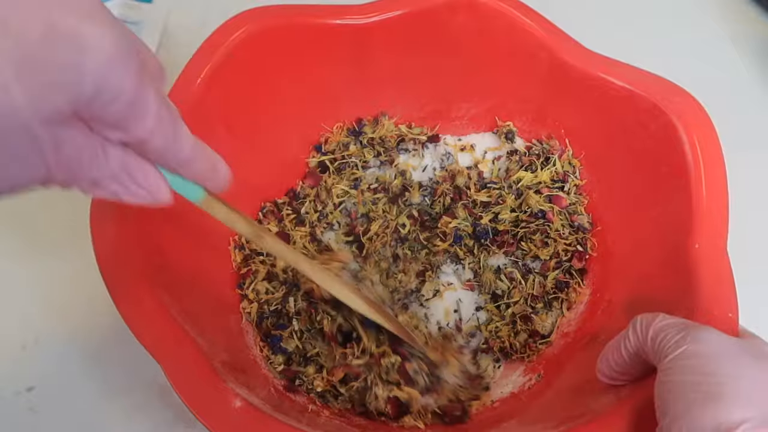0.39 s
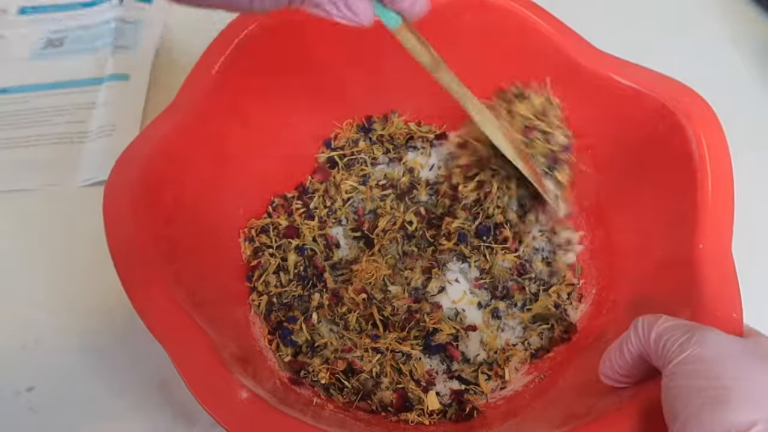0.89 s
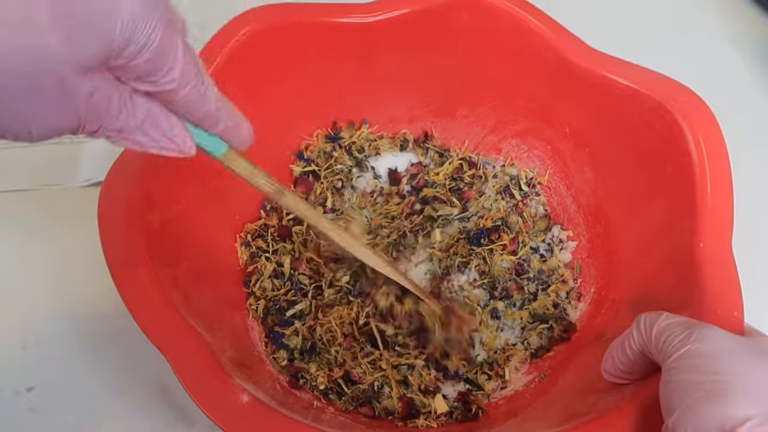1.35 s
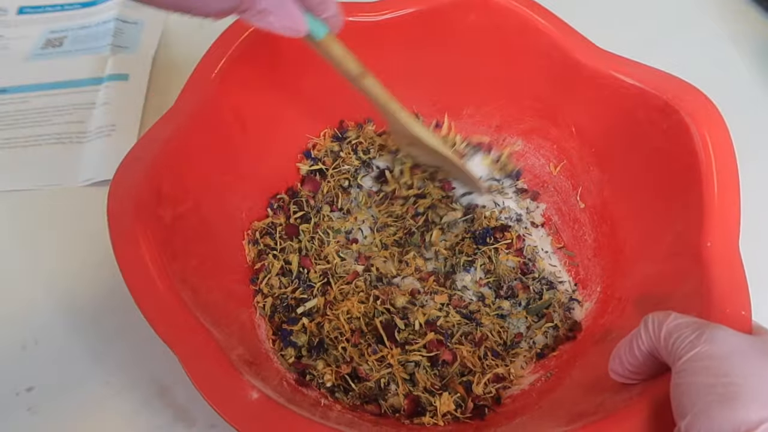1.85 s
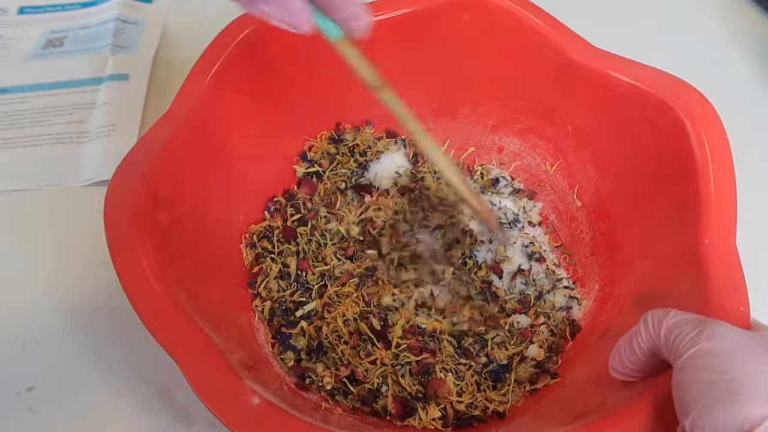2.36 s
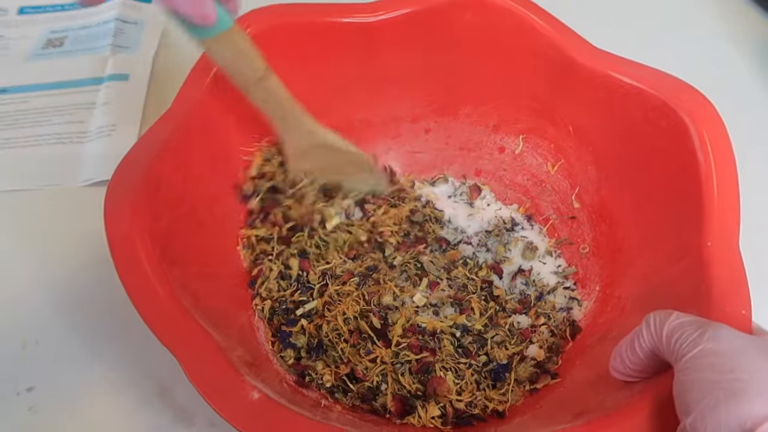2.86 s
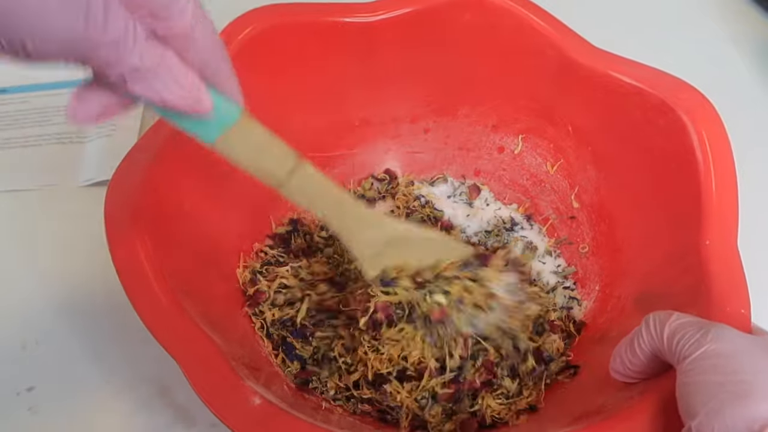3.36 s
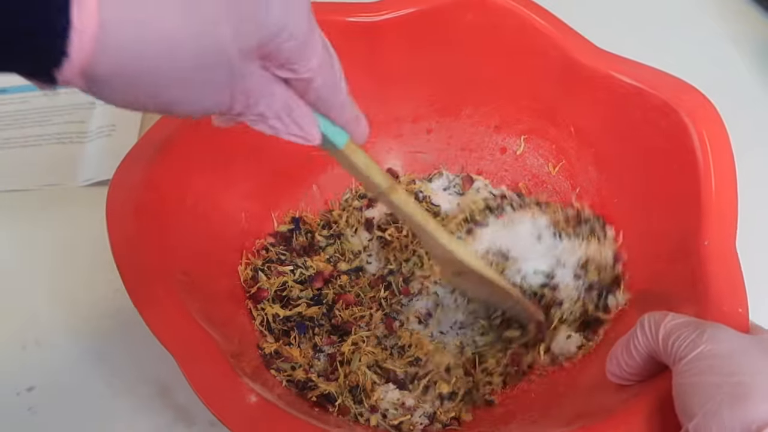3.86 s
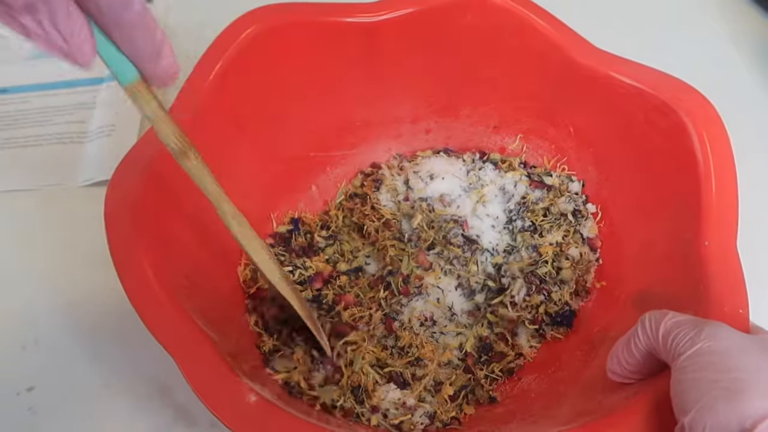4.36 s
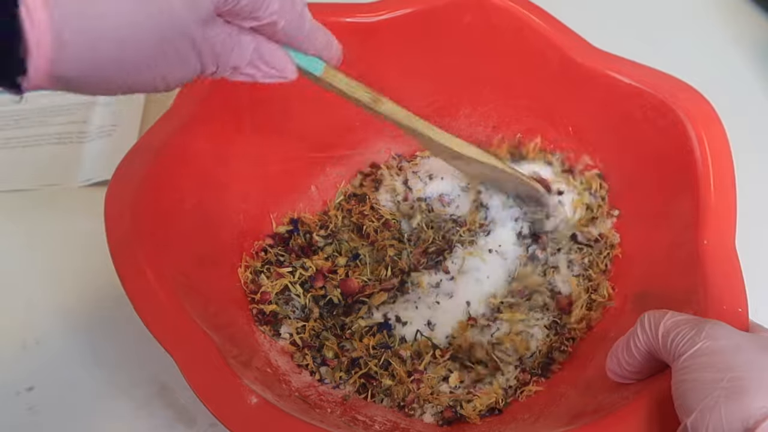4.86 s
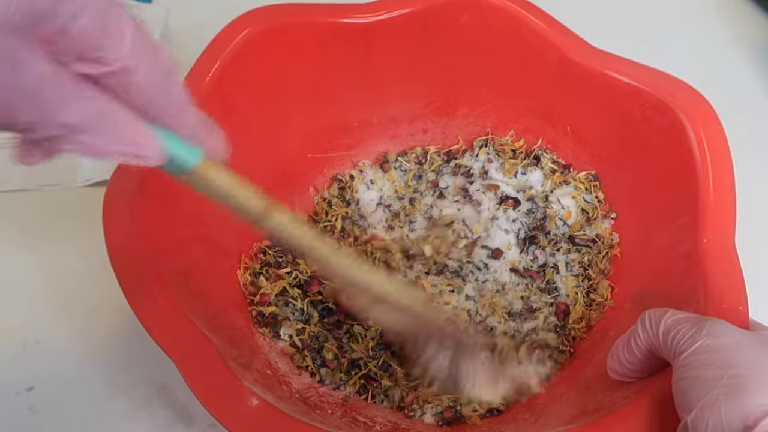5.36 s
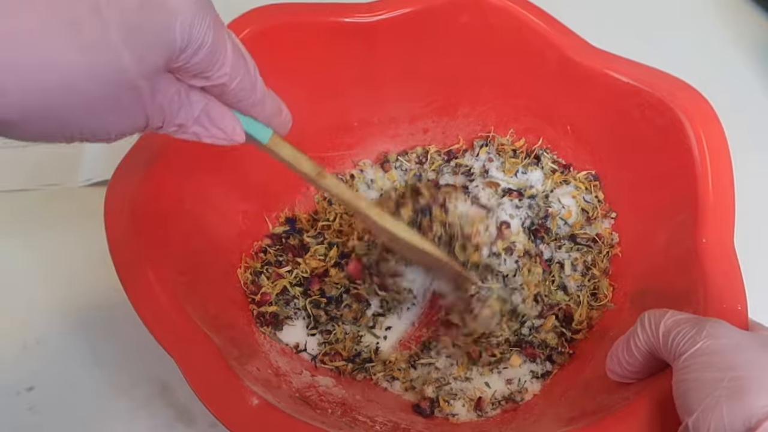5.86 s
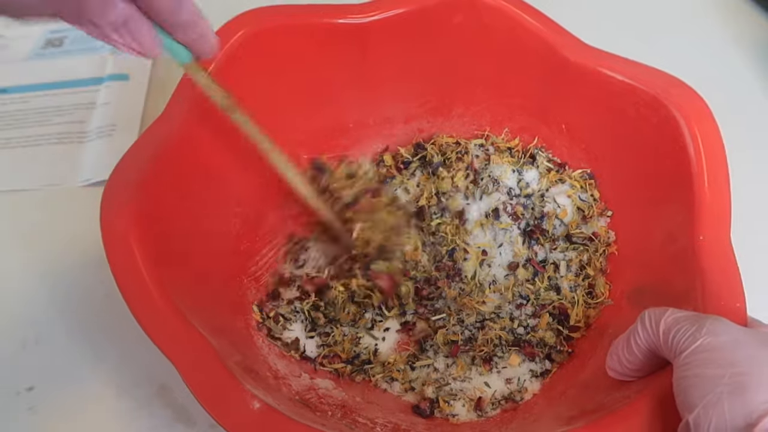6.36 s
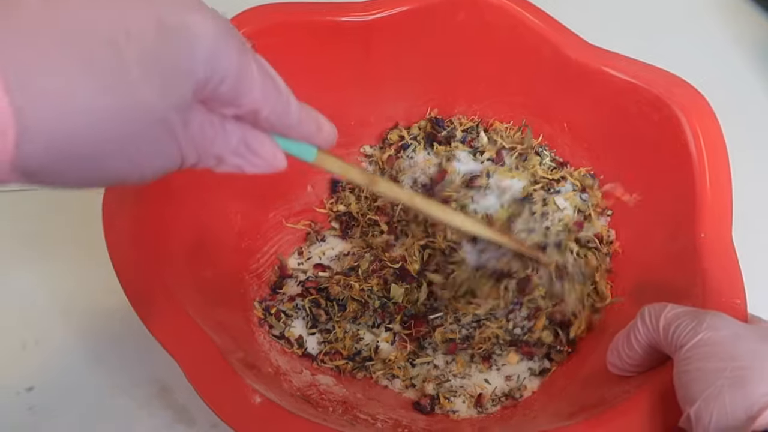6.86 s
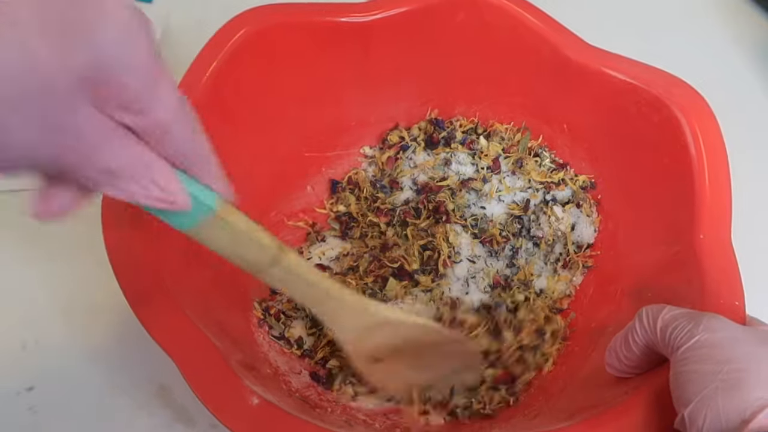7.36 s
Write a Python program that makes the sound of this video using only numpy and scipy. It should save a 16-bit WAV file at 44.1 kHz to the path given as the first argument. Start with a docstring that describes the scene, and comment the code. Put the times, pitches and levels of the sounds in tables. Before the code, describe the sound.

Gritty, crackling stirring of salt crystals and dry petals in a plastic bowl, with hard spoon taps and thuds in a quiet room.

```python
"""A wooden spoon stirs salt crystals and dried flowers round a plastic bowl on a table, heard very close.
Thousands of random grain clicks crunch through the bowl's resonances, with fizz and small cracks on top.
Now and then the spoon's edge sings on bare plastic, or it knocks the wall or bumps the bowl on the table:
short bursts set off banks of dying sines. A small quiet room rings softly after, over a low steady murmur.
"""
import sys
import numpy as np
from scipy import signal
from scipy.fft import rfft, irfft, next_fast_len
from scipy.io import wavfile
from scipy.ndimage import uniform_filter1d

SR = 44100
rng = np.random.default_rng(int(sys.argv[2]) if len(sys.argv) > 2 else 0)


def voltage_ratio(level):
    """Linear amplitude factor for a level in decibels (scalar or array-like)."""
    return 10 ** (np.asarray(level, float) / 20)


def bounce(signal):
    """Save signal as a 16-bit WAV file at the path given by the first command-line argument."""
    frames = np.transpose(np.atleast_2d(signal))
    limited = np.clip(frames, -1, 1)
    pcm = np.round(limited * 32767).astype(np.int16)
    wavfile.write(sys.argv[1], SR, pcm)


N = 340452

# Room murmur, spectrum shape: (frequency [Hz], relative density [dB per Hz])
HUSH_SPECTRUM = [(25, 4), (50, -8), (120, -8.5), (250, -10.5), (500, -15), (700, -21), (1000, -23.5),
                 (2000, -25), (5000, -30), (10000, -32.5), (16000, -30.5)]
# Murmur, difference between the channels against what they share: (frequency [Hz], level [dB])
HUSH_WIDTH = [(30, -23), (250, -2), (1000, -2), (4000, -9), (13000, -5)]
# Room decay: (frequency [Hz], time to fall 60 dB [s])
ROOM_DECAY = [(100, 0.63), (400, 0.24), (1500, 0.24), (5000, 0.24), (12000, 0.11)]
# Stirring, difference between the channels: nearly mono around 1 kHz, wide in the treble:
# (frequency [Hz], level [dB])
STIR_WIDTH = [(100, -62), (500, -17), (1000, -49), (2000, -27), (4000, -21), (8000, -7.5), (13000, 0.5)]
# Blows on bowl and table, difference between the channels: (frequency [Hz], level [dB])
BLOW_WIDTH = [(300, -36), (900, -27), (2000, -20), (5000, -13), (13000, -2)]

# Resonances of each part: (frequency [Hz], relative level [dB], time to fall 60 dB [s])
TABLE_MODES = [(117, 4.5, 0.15), (157, -2, 0.16), (181.6, 1.5, 0.2), (251.5, 4.5, 0.13), (292, 6.5, 0.12),
               (220, 12.5, 0.017)]
BELLY_MODES = [(240, -6.5, 0.004), (348, 2, 0.03), (413, 6, 0.036), (450, 4, 0.048), (524, -1, 0.12),
               (572, 1.5, 0.018), (776, 5, 0.019)]
SPOON_MODES = [(858, -10.5, 0.009), (990, 4, 0.026), (1236, -6.5, 0.0044)]
WALL_MODES = [(1195, -8.5, 0.013), (1467, -5, 0.016), (1960, -4.5, 0.019), (2354, -3.5, 0.014),
              (2900, 2.5, 0.0078), (3432, 3, 0.017), (3970, 1.5, 0.017), (4850, 6, 0.0073),
              (5440, 0.5, 0.0082), (6000, -0.5, 0.011), (6600, -4.5, 0.006)]
# A crystal's snap, spectrum shape: (frequency [Hz], relative density [dB per Hz])
SNAP_SPECTRUM = [(1500, -36.5), (2800, -9.5), (5000, -6.5), (7000, -9), (10000, -12.5), (13000, -13.5),
                 (15000, -18), (16000, -27)]

# The bowl bumps the table: (time [s], table thud peak [dB], belly against the thud [dB])
BUMPS = [(1.256, -37, 15), (1.656, -19.5, 5), (2.013, -24.5, -2.5), (2.555, -33, 1.5), (2.636, -32, 4.5),
         (2.804, -32, -25), (3.103, -40, 13.5), (3.653, -25.5, -1), (3.871, -26, 7.5), (4.583, -23.5, -0.5),
         (5.485, -28.5, 3), (5.618, -36, 16), (5.855, -47.5, 12.5), (6.418, -46, 11), (6.453, -45, 18.5),
         (7.326, -12, -7), (7.353, -22, -4), (7.399, -28, -3)]
# The spoon hits the wall; two rows under 1 ms apart are one hit with two favoured pitches:
# (time [s], wall peak [dB], wall pitch favoured by the spot struck [Hz],
# crack against the wall [dB], spoon against the wall [dB])
KNOCKS = [(1.2305, -28, 1360, -39, -5), (1.2567, -15, 1380, -33, -2.5), (1.55, -37, 3030, -22, -30),
          (1.6495, -13, 2600, -28, -30), (1.6535, -3, 1870, -31.5, -18), (1.6625, -14.5, 3960, -39, -16),
          (1.7218, -22, 1910, -16, -10), (1.7786, -18, 3030, -13.5, -24), (2.0166, -15, 2550, -20.5, -14),
          (2.0418, -19, 3020, -27, -6), (2.2665, -28, 4450, -25, -9), (2.5568, -9, 2060, -16, -10.5),
          (2.597, -29, 2200, -10, -22), (2.6362, -11, 1970, -20.5, -9), (2.6417, -15, 2590, -13.5, -26),
          (2.654, -40, 3530, -21, -28), (2.7, -22, 2140, -19, -5), (2.7906, -18, 2000, -23, -30),
          (2.807, -17, 2150, -26, -22), (3.5167, -21, 2270, -34, -23), (3.5593, -29, 3330, -23, -18),
          (3.5863, -15, 2360, -23.5, -12.5), (3.6124, -18, 1620, -16, -21), (3.8606, -26, 2210, -31, -23),
          (4.3976, -27.5, 2250, -13.5, -23), (4.5845, -17.5, 2900, -21, -4.5),
          (4.8269, -20, 1850, -30, -16), (4.907, -18.5, 2140, -21, -37), (5.4826, -6.5, 2400, -25, -7),
          (5.4832, -7, 6160, -21, -26), (5.616, -22, 1860, -16, -4), (5.6205, -19, 1850, -17, -6),
          (5.712, -21.5, 1250, -34, -12), (5.7195, -23, 1250, -34, -9), (5.727, -20, 2300, -32, -14),
          (5.7413, -14.5, 1150, -40, -7), (5.8563, -24.5, 1320, -27, -14), (6.1383, -30.5, 1400, -30, 1),
          (6.2482, -17, 1360, -20, -10), (6.2673, -21.5, 1760, -16, -32), (6.4174, -28, 1960, -16, 3),
          (6.4553, -19, 1770, -24, -18), (7.3256, -14.5, 3750, -15, -14), (7.3262, -5.5, 1610, -32, -8.5),
          (7.698, -30, 3530, -19, -20)]
# The spoon's edge drags on bare plastic: (start [s], end [s], pitch [Hz], level [dB])
DRAGS = [(0.367, 0.45, 1050, -41), (1.3, 1.65, 540, -56), (1.36, 1.65, 360, -46), (1.41, 1.66, 2000, -47),
         (1.655, 1.735, 1970, -34.5), (2.55, 2.78, 980, -41), (3.53, 3.585, 1050, -48),
         (3.587, 3.64, 1100, -40), (4.94, 5.2, 440, -49.5), (4.97, 5.02, 950, -44), (5.38, 5.48, 1080, -48),
         (5.48, 5.57, 1030, -39), (5.63, 5.69, 540, -36), (6.04, 6.13, 1050, -49), (6.7, 6.76, 3500, -46)]
# Pushes through the heap: (start [s], swell [s], hold [s], crunch fade [dB/s], peak crunch [dB],
# share of hard salt at the start [0-1])
PUSHES = [(-.05, 0.018, 0.027, 15, -34.5, 0.34), (0.086, 0.16, 0.028, 33, -34.5, 0.23),
          (0.285, 0.13, 0.049, 42, -34.5, 0.28), (0.618, 0.082, 0.063, 163, -35, 0.2),
          (0.8, 0.08, 0.034, 24, -32, 0.34), (0.899, .008, 0.028, 80, -37, 0.6),
          (0.991, 0.11, 0.15, 68, -31.5, 0.31), (1.618, .03, .01, 100, -42, 0.2),
          (1.672, 0.054, 0.085, 34, -31.5, 0.34), (1.974, 0.022, 0.044, 24, -32.5, 0.29),
          (2.25, 0.023, 0.026, 101, -48.5, 0.98), (2.543, 0.0083, 0.048, 38, -35, 0.36),
          (2.626, 0.0062, 0.0048, 300, -27.5, 0.26), (2.671, 0.12, 0.055, 26, -30.5, 0.38),
          (2.857, 0.082, 0.075, 12, -33, 0.37), (3.235, 0.067, 0.23, 60, -49, 0.79),
          (3.498, 0.056, 0.018, 67, -37, 0.34), (3.579, .005, 0.016, 90, -36, 0.4),
          (3.603, 0.13, 0.069, -9, -32.5, 0.35), (4.03, 0.095, 0.056, 191, -47, 1),
          (4.372, 0.021, 0.0063, 140, -36.5, 0.18), (4.469, 0.1, 0.026, 79, -30, 0.25),
          (4.706, 0.11, 0.011, 87, -38, 0.57), (4.884, 0.1, 0.012, 81, -34, 0.4),
          (5.041, 0.057, 0.048, 86, -35.5, 0.29), (5.2, 0.043, 0.13, 60, -55.5, 1),
          (5.391, 0.081, .01, 100, -38, 0.35), (5.503, 0.04, 0.05, 7, -34, 0.33),
          (5.915, 0.04, 0.12, 104, -52.5, 1), (6.239, 0.002, 0.0064, 109, -36, 0.33),
          (6.306, 0.085, 0.066, 59, -30, 0.45), (6.651, 0.055, 0.015, 95, -35, 0.51),
          (6.77, 0.036, 0.028, 64, -46, 1), (6.863, .18, 0.054, 136, -32, 0.39),
          (7.328, 0.069, 0.091, 47, -32.5, 0.43)]

HUSH_DB = -45.5
ROOM_DB, BLOW_ROOM_DB = -5, -5.5  # the bowl's wall shields the room from part of a blow
PLACES = 3
LEAN = np.linspace(-1, 1, PLACES)[:, None]  # each place, from one side of the bowl to the other

# Blows: contact within the burst; how far the burst starts ahead of the row's time
CONTACT_S, LEAD_S = 0.006, 0.005
GRIT, GRIT_BEFORE_S, GRIT_AFTER_S = 0.03, 0.0008, 0.002  # crushed grains: size against contact, spread in time
# A reflection after each knock; its crack is 7 dB stronger against the ring than in the first hit
ECHO_S, ECHO_DB, ECHO_CRACK_DB = 0.0113, -18, 7
WALL_DB, CRACK_DB, SPOON_DB = 14.0, 28.0, 21.3  # a part's whole ring against its peak level
BELLY_DB, TABLE_DB = 22.05, 21.45  # likewise
KNOCK_BELLY_DB = -26  # against the wall
THUD_START_S = 0.0033  # thud start, counted from the start of the blow's burst
BLOW_LOW_HZ = 99  # no deep bass in any blow

# Drags: rms pitch wander as a share, its pace; fall of 60 dB in cycles, capped for low rubs
WAVER, WAVER_S, DRAG_CYCLES, DRAG_LONGEST_S = 0.01, 0.03, 45, 0.02

# Stirring
BITE_S, BITE_DB = 0.0009, -10  # a push jumps at once to this far under its crunch peak, then swells
RUN_OUT = 108  # extra fall as the heap settles: dB per s squared, times the square of the fade time
SALT_SINKS_S = 0.4  # salt share falls to 1/e in this time, as petals pile on the spoon
# Level against the crunch peak; change with salt; share of the push's dB swing
FIZZ_DB, FIZZ_PER_SALT_DB, FIZZ_FOLLOWS = -12, 18, 0.81
RUMBLE_DB, RUMBLE_PER_SALT_DB, RUMBLE_FOLLOWS = -9, -15, 0.96
RUMBLE_LAG_S = 0.0055  # the belly swells a little late
LUMPS_DB, PATCHY_DB = 0.8, 1.5  # rms wander of the coarse grains and of the bands
SOFT_TOP_HZ, HARD_FROM_HZ = 3300, 2200  # wall modes reached by soft petals, and by hard salt
COARSE_SNAP_SHARE = 0.3  # power share of the fizz that comes from coarse grains
PINGS_PER_S, PING_LOW_HZ, PING_HIGH_HZ = 400, 1800, 12000
PING_CYCLES, PING_DB, PING_SPREAD_DB = 110, -4, 4  # fall of 60 dB; level against fizz; uneven sizes


def read(points, hz):
    """A curve read at given frequencies, straight over log frequency."""
    f, value = np.transpose(points)
    return np.interp(np.log(hz + 1), np.log(f + 1), value)


def ring(modes, detune=1, flip=-1):
    """The dying sines that follow one tap, neighbours in opposite phase unless flip is 1, energy 1."""
    t = np.arange(round(max(t60 for *_, t60 in modes) * SR)) / SR
    out = np.zeros(len(t))
    for k, (hz, db, t60) in enumerate(modes):
        out += flip ** k * voltage_ratio(db - 60 * t / t60) * np.sin(2 * np.pi * hz * detune * t)
    return out / np.linalg.norm(out)


def snap(points):
    """A crystal's snap: the shortest causal (minimum-phase) click with this spectrum, energy 1."""
    log_gain = np.log(voltage_ratio(read(points, abs(np.fft.fftfreq(2048, 1 / SR)))))
    out = np.fft.ifft(np.exp(np.conj(signal.hilbert(log_gain)))).real[:512]
    return out / np.linalg.norm(out)


def grains(per_s, spread_db, clump_db):
    """Clicks of random sign and uneven size at each place in the bowl, in clumps; power 1 in all."""
    clumps = uniform_filter1d(rng.standard_normal(N), size=500)
    uneven = np.minimum(rng.exponential(1, (PLACES, N)), 5)
    size = voltage_ratio(spread_db * uneven + clump_db * clumps / clumps.std())
    falls = rng.random((PLACES, N)) < per_s / SR / PLACES
    train = size * falls * rng.choice([-1., 1.], (PLACES, N))
    return train / np.sqrt((train ** 2).sum(0).mean())


def through(drive, response):
    """Every place's drive played through its response."""
    return signal.oaconvolve(drive, np.atleast_2d(response), axes=1)[:, :N]


def two_channels(common, apart, width):
    """Both channels share one sound and differ by another, shaped by width and a quarter turn off."""
    size = next_fast_len(N)
    gain = voltage_ratio(read(width, np.fft.rfftfreq(size, 1 / SR)))
    side = irfft(1j * rfft(apart, size) * gain, size)[:N]
    return np.array([common + side, common - side])


def hush():
    """The low steady murmur of the room's air and machines: shaped noise."""
    gain = voltage_ratio(read(HUSH_SPECTRUM, np.fft.rfftfreq(N, 1 / SR)))
    noise = irfft(rfft(rng.standard_normal((2, N))) * gain, N)
    return voltage_ratio(HUSH_DB) * two_channels(*noise / noise.std(), HUSH_WIDTH)


def room(places):
    """Sparse reflections, one in every 20 samples, each band dying at its own speed; others for each place."""
    taps = np.zeros((PLACES, SR // 2))
    at = np.arange(440, SR // 2 - 20, 20)
    when = at + rng.integers(0, 20, (PLACES, len(at)))
    np.put_along_axis(taps, when, rng.choice([-1., 1.], when.shape), 1)
    hz, t, z = signal.stft(taps, SR, nperseg=256)
    decay = voltage_ratio(-60 * t / read(ROOM_DECAY, hz)[:, None])
    tail = signal.istft(z * decay, SR, nperseg=256)[1]
    return through(places, tail / np.linalg.norm(tail[0]))


def pulse(t, tau):
    """A push that swells, peaks at tau and dies away."""
    return (t / tau) * np.exp(-t / tau)


def hard_push(t):
    """The single short push of a hard contact."""
    return np.roll(pulse(t, 0.00008), round(CONTACT_S * SR))


def add_blow(out, s, db, source, part):
    """Adds a part's response to a blow, its whole energy set by db."""
    sound = signal.fftconvolve(source, part)
    start = round((s - LEAD_S) * SR)
    out[start:][:len(sound)] += voltage_ratio(db) * sound / np.linalg.norm(sound)


def bumps():
    """The bowl hits the table: a push rings the belly, and a push with rough rocking rings the table."""
    t = np.arange(3000) / SR
    rough = rng.standard_normal((len(BUMPS), len(t)))
    rocks = pulse(t, 0.00072) + 0.5 * rough * pulse(t, 0.044)
    out = np.zeros(N + SR)
    for (s, thud_db, belly_over_db), rock in zip(BUMPS, rocks):
        add_blow(out, s + THUD_START_S, thud_db + TABLE_DB, rock, ring(TABLE_MODES))
        add_blow(out, s, thud_db + belly_over_db + BELLY_DB, hard_push(t), ring(BELLY_MODES, flip=1))
    return out


def knocks():
    """Grains crushed round a hard contact ring the wall, spoon and belly; a faint, smeared, bright echo follows."""
    t = np.arange(3000) / SR
    spread_s = np.where(t < CONTACT_S, GRIT_BEFORE_S, GRIT_AFTER_S)
    grit = rng.standard_normal((len(KNOCKS), 2, len(t))) ** 3
    bursts = GRIT * grit * np.exp(-abs(t - CONTACT_S) / spread_s)
    bursts[:, 0, round(CONTACT_S * SR)] = 1  # the hit has one sharp contact, the echo is smeared
    out = np.zeros(N + SR)
    for (s, peak_db, spot_hz, crack_over_db, spoon_over_db), (crush, smear) in zip(KNOCKS, bursts):
        # modes lose 21 dB an octave away from the favoured pitch
        wall = ring([(hz, db - 21 * abs(np.log2(hz / spot_hz)), t60) for hz, db, t60 in WALL_MODES])
        arrivals = ((s, peak_db, 0, crush),
                    (s + ECHO_S, peak_db + ECHO_DB, ECHO_CRACK_DB, smear))
        for at, wall_peak_db, bright_db, burst in arrivals:
            add_blow(out, at, wall_peak_db + WALL_DB, burst, wall)
            crack_db = wall_peak_db + bright_db + crack_over_db + CRACK_DB
            add_blow(out, at, crack_db, burst, snap(SNAP_SPECTRUM))
        add_blow(out, s, peak_db + spoon_over_db + SPOON_DB, hard_push(t), ring(SPOON_MODES))
        belly_db = peak_db + KNOCK_BELLY_DB + BELLY_DB
        add_blow(out, s, belly_db, hard_push(t), ring(BELLY_MODES, flip=1))
    return out


def blows_on_bowl():
    """Knocks and bumps together, their deep bass taken off."""
    low_cut = signal.butter(4, BLOW_LOW_HZ, "high", fs=SR, output="sos")
    return signal.sosfilt(low_cut, (knocks() + bumps())[:N])


def drags():
    """Quick uneven slips of the wooden edge sing in one fuzzy, wandering resonance."""
    out = np.zeros(N)
    slips = grains(per_s=2500, spread_db=2.5, clump_db=2.5).sum(0)
    wander = uniform_filter1d(rng.standard_normal(N), round(WAVER_S * SR))
    for start, end, hz, db in DRAGS:
        span = slice(round(start * SR), round(end * SR))
        pitch = hz * (1 + WAVER * wander[span] / wander.std())
        turn = np.exp(2j * np.pi * np.cumsum(pitch) / SR)
        r = voltage_ratio(-60 / (SR * min(DRAG_CYCLES / hz, DRAG_LONGEST_S)))
        # a resonator that turns with the wandering pitch
        sung = (turn * signal.lfilter([np.sqrt(2 - 2 * r ** 2)], [1, -r], slips[span] / turn)).real
        out[span] += voltage_ratio(db) * sung * signal.windows.tukey(len(turn), 0.25)
    return out


def pushes():
    """Crunch, fizz, rumble and salt share over time; overlapping pushes add in power."""
    t = np.arange(0, N / SR, 0.001)
    start, swell, hold, fade, peak_db, salt = (c[:, None] for c in np.transpose(PUSHES))

    def shape_db(u):
        """Swell, hold and steepening fade of a push."""
        late = np.maximum(u - swell - hold, 0)
        return BITE_DB * np.clip(1 - u / swell, 0, 1) - fade * late - RUN_OUT * late ** 2

    u = t - start
    bite = np.clip(1 + u / BITE_S, 0, 1)
    salt = np.clip(salt, 0, 1) * np.exp(-np.maximum(u, 0) / SALT_SINKS_S)
    fizz_db = FIZZ_DB + FIZZ_PER_SALT_DB * salt + FIZZ_FOLLOWS * shape_db(u)
    rumble_db = RUMBLE_DB + RUMBLE_PER_SALT_DB * salt + RUMBLE_FOLLOWS * shape_db(u - RUMBLE_LAG_S)
    crunch = bite * voltage_ratio(peak_db + shape_db(u))
    fizz = bite * voltage_ratio(peak_db + fizz_db)
    rumble = bite * voltage_ratio(peak_db + rumble_db)
    power = [(part ** 2).sum(0) + 1e-20 for part in (crunch, fizz, rumble)]
    mean_salt = (crunch ** 2 * salt).sum(0) / power[0]
    return [np.interp(np.arange(N) / SR, t, v) for v in (*np.sqrt(power), mean_salt)]


def pings():
    """Single crystals and dry buds crack, each a brief dying sine at its own pitch; power 1 in all."""
    when, pitch, where, size = rng.random((round(PINGS_PER_S * N / SR), 4)).T
    hz = PING_LOW_HZ * (PING_HIGH_HZ / PING_LOW_HZ) ** pitch[:, None]
    steps = np.arange(600)
    turns = hz * steps / SR
    size_db = -PING_SPREAD_DB * np.log(np.maximum(size, 0.01))[:, None]
    sines = voltage_ratio(size_db - 60 * turns / PING_CYCLES) * np.sin(2 * np.pi * turns)
    place = (where * PLACES).astype(int)[:, None]
    out = np.zeros((PLACES, N + len(steps)))
    np.add.at(out, (place, (when * N).astype(int)[:, None] + steps), sines)
    return out[:, :N] / np.sqrt((out ** 2).sum(0).mean())


def patches(modes):
    """A part rings a little higher or lower from place to place."""
    return np.array([ring(modes, detune=1 + 0.091 * lean) for lean in LEAN[:, 0]])


def patchy(places):
    """As the heap slides, bands some hundreds of Hz wide brighten and dull for a few tens of ms."""
    z = signal.stft(places, nperseg=512)[2]
    field = uniform_filter1d(rng.standard_normal(z.shape[1:]), size=9, axis=0)
    field = uniform_filter1d(field, size=10, axis=1)
    gain = voltage_ratio(PATCHY_DB * field / field.std())
    return signal.istft(z * gain / np.sqrt((gain ** 2).mean()), nperseg=512)[1][:, :N]


def stirring():
    """Coarse grains dragged by the spoon drive wall, spoon and belly; fine crystals fizz and crack on top."""
    crunch, fizz, rumble, salt = pushes()
    coarse = grains(per_s=7000, spread_db=4.0, clump_db=0.3)
    lumps = uniform_filter1d(rng.standard_normal((PLACES, N)), size=3000)
    coarse = coarse * voltage_ratio(LUMPS_DB * lumps / lumps.std())  # the heap gives way unevenly, place by place
    fine = grains(per_s=15000, spread_db=0.0, clump_db=1.6)

    # soft petals reach the spoon and the low wall modes, hard salt the high ones
    low = [mode for mode in WALL_MODES if mode[0] < SOFT_TOP_HZ]
    high = [mode for mode in WALL_MODES if mode[0] > HARD_FROM_HZ]
    wall = through(coarse * crunch * np.sqrt(1 - salt), patches(low))
    wall = wall + through(coarse * crunch * np.sqrt(salt), patches(high))
    spoon = through(coarse * crunch * voltage_ratio(-8.0) * (1 - salt), patches(SPOON_MODES))

    faint_table = [(hz, db - 20.5, t60) for hz, db, t60 in TABLE_MODES]
    belly = through(coarse * rumble, patches(BELLY_MODES + faint_table))

    snaps = np.sqrt(COARSE_SNAP_SHARE) * coarse + np.sqrt(1 - COARSE_SNAP_SHARE) * fine
    crackle = through(snaps * fizz, snap(SNAP_SPECTRUM))
    return wall + spoon + belly + crackle + voltage_ratio(PING_DB) * fizz * pings()


def scene():
    """Grains all over the bowl, blows and drags from one side of it, the room behind."""
    places = patchy(stirring())
    places[-1] += drags()
    blows = blows_on_bowl()
    places += voltage_ratio(ROOM_DB) * room(places + voltage_ratio(BLOW_ROOM_DB) * blows * (LEAN > 0))
    bowl = two_channels(places.sum(0), (LEAN * places).sum(0), STIR_WIDTH)
    return bowl + two_channels(blows, blows, BLOW_WIDTH) + hush()


def roll_off(x):
    """The treble ends steeply here."""
    return signal.sosfilt(signal.butter(12, 16440, fs=SR, output="sos"), x)


def record(dry):
    """The small microphone drops the deep bass, peaks stop at full scale, and the top treble is cut."""
    low_cut = signal.butter(2, 70, "high", fs=SR, output="sos")
    thin = signal.sosfilt(low_cut, dry)
    treble_cut = signal.firwin(255, 15950, fs=SR)[None]
    mix = signal.oaconvolve(np.clip(thin, -1, 1), treble_cut, "same")
    return roll_off(mix)


dry = scene()
out = record(dry)
bounce(out)
```